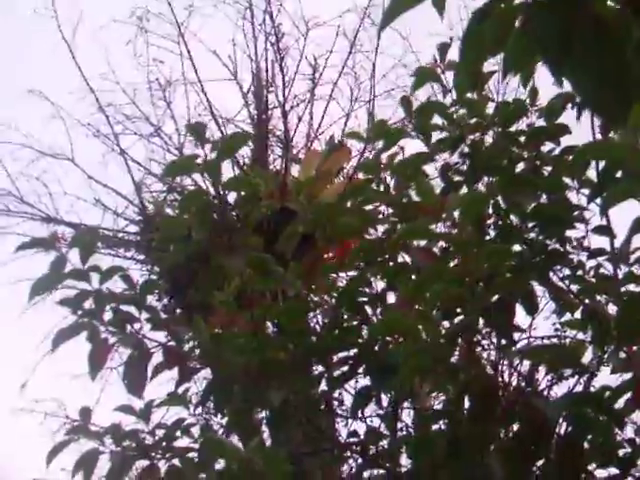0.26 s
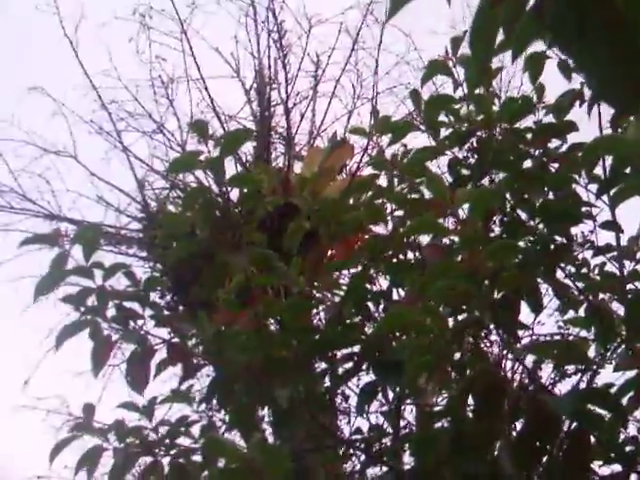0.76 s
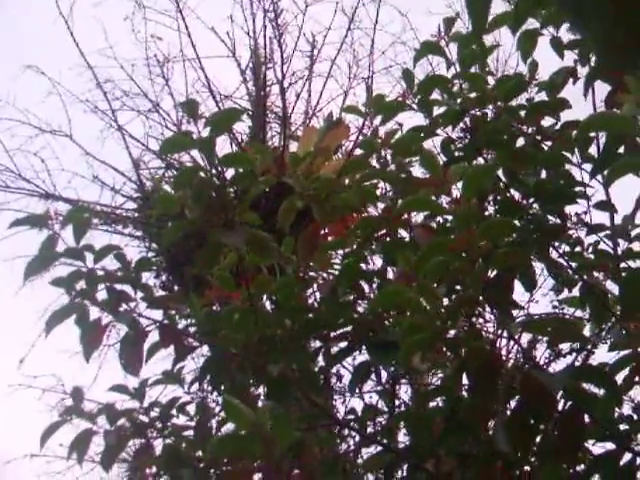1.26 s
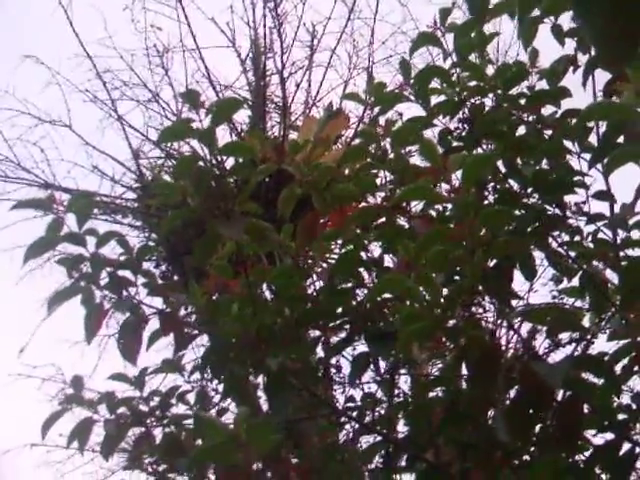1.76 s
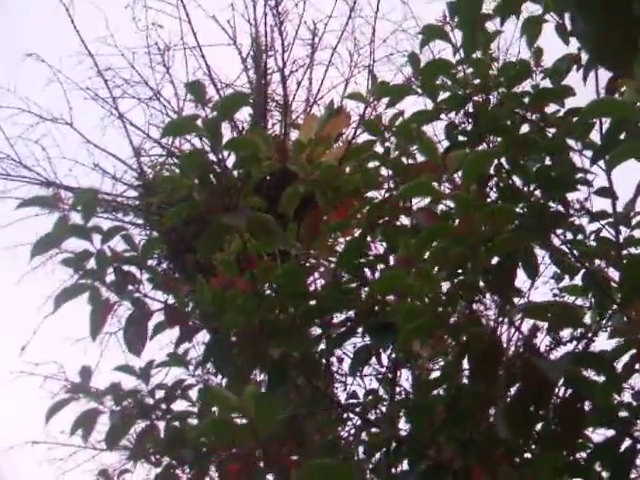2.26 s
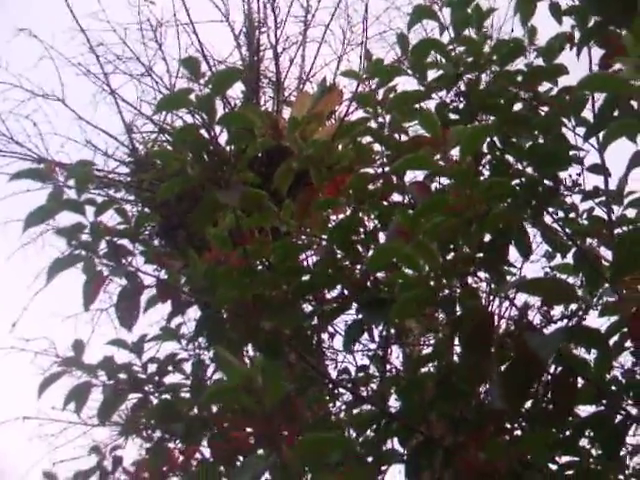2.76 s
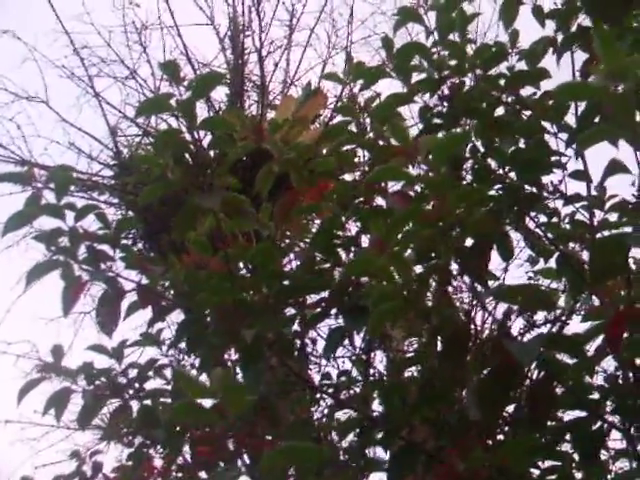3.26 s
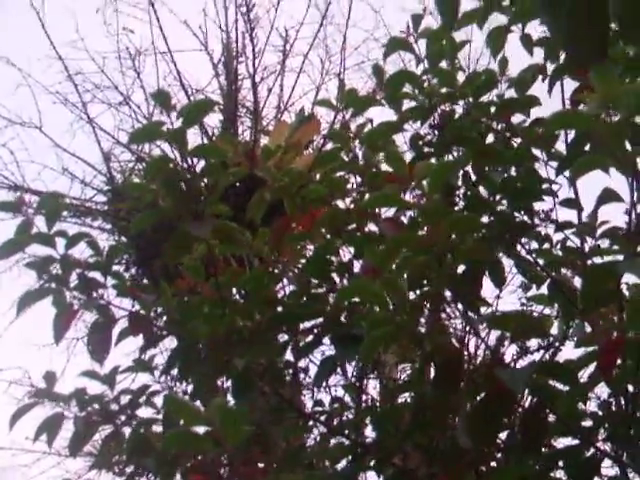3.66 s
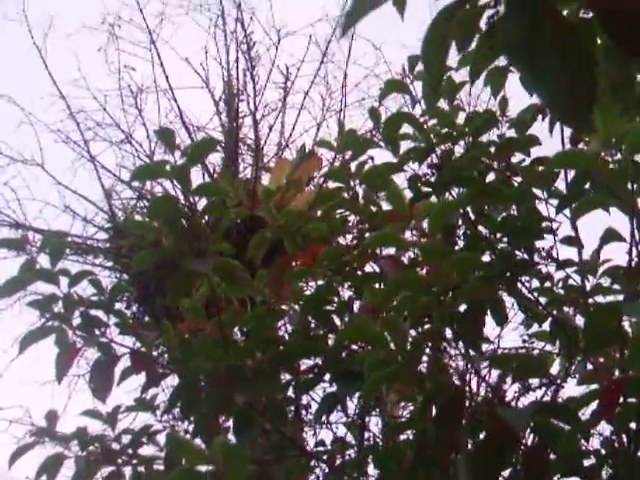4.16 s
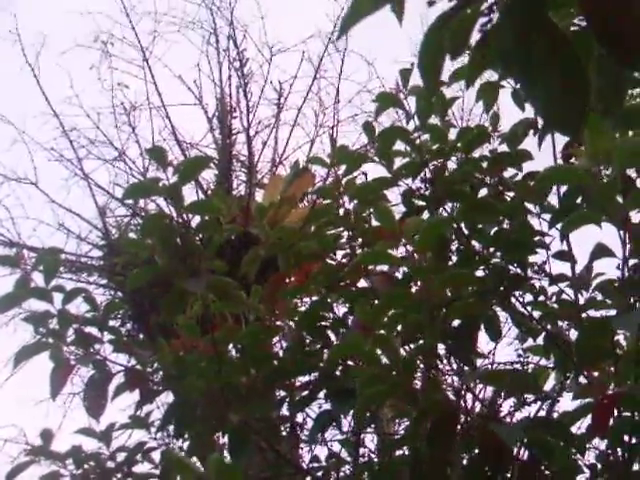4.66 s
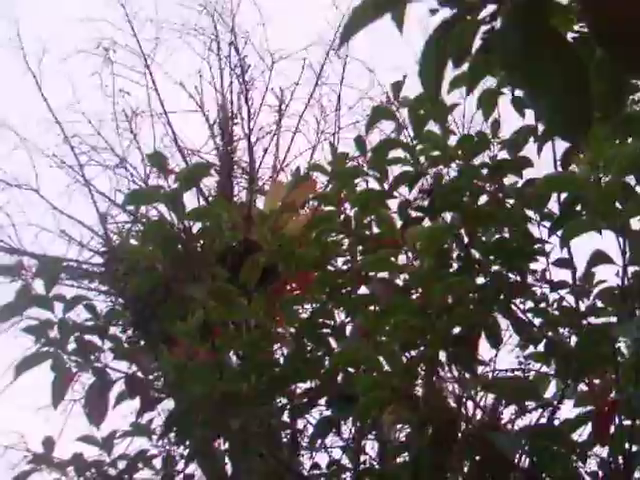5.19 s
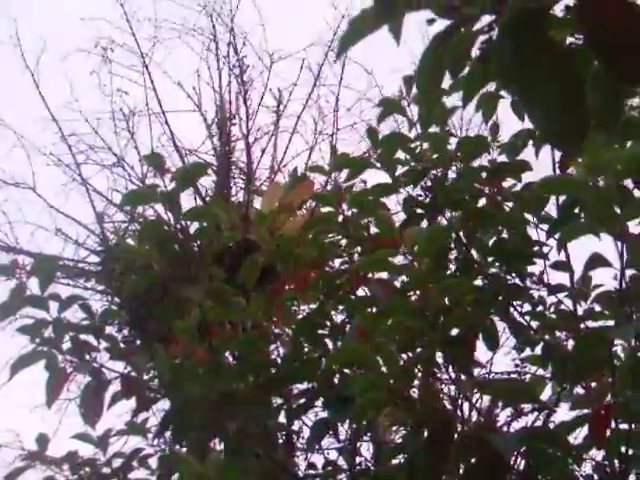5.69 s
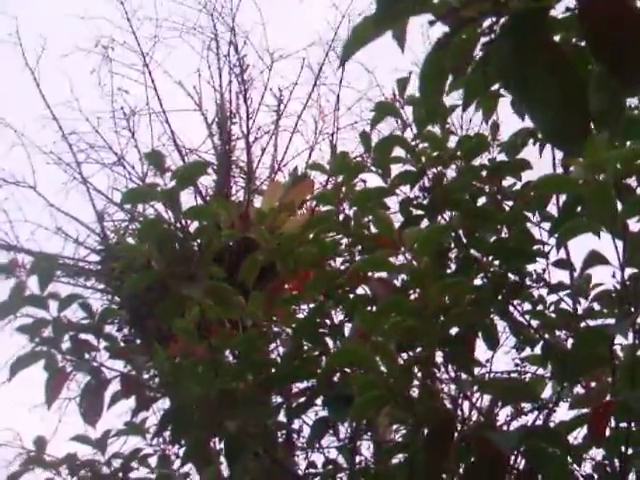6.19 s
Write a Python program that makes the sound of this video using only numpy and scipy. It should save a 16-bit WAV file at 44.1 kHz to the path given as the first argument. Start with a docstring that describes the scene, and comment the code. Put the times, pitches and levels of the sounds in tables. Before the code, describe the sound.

Several birds call over one another outdoors, sharp high chips nearby, slurred whistles behind, distant chirps echoing among trees over faint hiss.

```python
"""A small bird close by gives thin, high calls that mostly fall, in a dawn chorus among trees. A songbird further
off whistles and slurs its phrases, a third bird twitters faintly, and there are a few rasps and bill clicks.
Each voice is a near sine on a gliding pitch, buzzed by a flutter; rasps and clicks are noise through resonances.
Leaves and trunks add an echo tail to every call. Behind lie many distant birds, a hush of air and microphone
hiss, a narrow band of noise as a far-off hum, and a camera's thin whine."""
import sys
import numpy as np
from scipy import signal
from scipy.fft import rfft, irfft
from scipy.io import wavfile
from scipy.ndimage import uniform_filter1d

SR = 44100
rng = np.random.default_rng(int(sys.argv[2]) if len(sys.argv) > 2 else 0)


def generate_wav(sig):
    """Save sig (samples, or channels by samples) to the path in sys.argv[1] as 16-bit PCM at SR."""
    pcm = np.round(np.clip(np.atleast_2d(sig).T, -1, 1) * 32767).astype(np.int16)
    wavfile.write(sys.argv[1], SR, pcm)


N = 283563  # length of the scene in samples


def undb(db):
    """Turn decibels into a plain gain."""
    return 10 ** (np.asarray(db) / 20)


def add(out, start, sound):
    """Mix a sound in at its start time in seconds, cutting off what runs past the end."""
    i = max(int(start * SR), 0)
    out[i:i + len(sound)] += sound[:max(N - i, 0)]


def seconds(length):
    """The time axis of one note."""
    return np.arange(int(length * SR)) / SR


def band(x, hz, width_hz):
    """One resonance: it lets through a narrow range of pitches around hz."""
    b, a = signal.iirpeak(hz, hz / width_hz, SR)
    return signal.lfilter(b, a, x)


def level(x, db):
    """Scale a sound so that the rms of its loudest fiftieth of a second is db."""
    loudest_power = uniform_filter1d(x ** 2, size=SR // 50).max()
    return x * undb(db) / np.sqrt(loudest_power)


def wander(n, rate):
    """A smooth random curve of spread near 1 that changes about rate times a second."""
    steps = np.arange(n) * rate / SR
    return np.interp(steps, np.arange(4096), rng.standard_normal(4096))


def foliage(x, wet_db, t60, late_db, late_t60, build_s):
    """The direct sound, a dense scatter from nearby leaves and a weaker, longer one from trees beyond.

    wet_db is the energy of all echoes against the direct sound; each t60 is the seconds taken to fade by 60 dB.
    """
    t = np.arange(SR) / SR
    near_fade = undb(-60 * t / t60)
    late_fade = undb(late_db - 60 * t / late_t60)
    build_up = 1 - np.exp(-t / build_s)
    echoes = rng.standard_normal(SR) * (near_fade + late_fade) * build_up
    echoes *= undb(wet_db) / np.sqrt(np.sum(echoes ** 2))
    echoes[0] += 1  # the direct sound
    return signal.fftconvolve(x, echoes)


def syrinx(hz, buzz_hz, buzz_rate, crest, edge):
    """A bird's voice: a near sine follows a pitch path while an uneven flutter of the membrane buzzes it.

    Air pressure peaks at crest (0 = start, 1 = end); a smaller edge makes the start and end more abrupt.
    """
    n = len(hz)
    cycle = np.cumsum(buzz_rate * (1 + 0.2185 * wander(n, 118.6))) / SR
    flutter = np.sin(2 * np.pi * cycle) * (1 + 0.38 * wander(n, 140))
    unsteady_hz = hz * (1 + 0.0031 * wander(n, 141.4))
    pitch = unsteady_hz + buzz_hz * flutter
    swell = np.interp(np.linspace(0, 1, n), [0, np.clip(crest, .1, .9), 1], [0, .5, 1])
    pressure = np.abs(np.sin(np.pi * swell)) ** edge
    return pressure * np.sin(2 * np.pi * np.cumsum(pitch) / SR)


# Overall colour of the hush. Each row: pitch in Hz, relative level in dB per Hz.
HUSH_COLOUR = [(21, -36.5), (35, -5.5), (49, -4), (246, -9), (450, -7.5), (1610, -13.5), (2210, -12.5),
               (4830, -19.5), (7400, -20.5), (9620, -37), (16300, -120)]
# Slow change in the lower middle of the hush. Each row: time in seconds, level change in dB.
HUSH_SWELL = [(0, -.4), (1.2, 1.1), (2.3, 1.7), (3.2, -0.5), (6.4, -1)]
SWELL_HZ, SWELL_WIDTH_HZ = 560, 600
HUSH_DB = -44


def hush():
    """Shaped noise for distant air, running into flat microphone hiss at the top; its level drifts very slightly."""
    hz, db = np.transpose(HUSH_COLOUR)
    bins = np.clip(np.arange(N // 2 + 1) * SR / N, 1, 7000)  # the hiss is flat above 7000 Hz
    colour = undb(np.interp(np.log(bins), np.log(hz), db))
    air = irfft(rfft(rng.standard_normal(N)) * colour, N)
    swell_db = np.interp(np.arange(N) / SR, *np.transpose(HUSH_SWELL))
    air = air + (undb(swell_db) - 1) * band(air, SWELL_HZ, SWELL_WIDTH_HZ)
    return air / air.std() * undb(HUSH_DB + 0.22 * wander(N, 0.98))


WHINE_HZ, WHINE_DB = 7870, -56


def whine():
    """A thin sine tone from the camera's electronics, with a slightly unsteady pitch."""
    pitch = WHINE_HZ + 25 * wander(N, 200)
    return level(np.sin(2 * np.pi * np.cumsum(pitch) / SR), WHINE_DB)


def far_chorus(count=46):
    """Many distant birds: soft gliding notes, each with a long echo tail nearly as strong as the note."""
    out = np.zeros(N)
    for k, (when, size, pitch, glide, loud) in enumerate(rng.random((count, 5))):
        hz = 2100 * 1.9 ** pitch
        length = 0.044 + 0.083 * size
        path = hz * (1 + 0.2507 * (glide - .6) * np.linspace(-1, 1, int(length * SR)))
        note = syrinx(path, 48, buzz_rate=55, crest=0.94, edge=0.94)
        echoed = foliage(note, wet_db=-1.5, t60=.7, late_db=-6.0, late_t60=1.1, build_s=0.022)
        start = (k + when) * N / SR / count  # one note at a random moment in each equal slot
        add(out, start, level(echoed, -55 + 6 * loud - 5 * pitch))  # higher notes are fainter
    return out


def arc(length, pitches):
    """A smooth glide through a start, middle and end pitch."""
    curve = np.polyfit([0, .5, 1], pitches, 2)
    return np.polyval(curve, np.linspace(0, 1, int(length * SR)))


def phrases(times, lead, notes):
    """Sing one phrase at each of its times: the lead whistle varies in length, the rest is timed from its end."""
    *lead_pitches, lead_buzz_hz = lead
    for start, lead_s, db in times:
        yield start, lead_s, *lead_pitches, db, lead_buzz_hz
        for delay, length, *pitches, step_db, buzz_hz in notes:
            yield start + lead_s + delay, length, *pitches, db + step_db, buzz_hz


# The songbird has three phrases: stair, slur and burr.
# When each phrase is sung. Each row: start of the lead whistle in seconds, its length in seconds, level in dB.
STAIRS = [(.163, 0.05, -37.5), (4.54, 0.096, -35), (5.124, .08, -33)]
SLURS = [(1.222, .074, -42), (3.365, .085, -41)]
BURRS = [(.713, .103, -33.5), (2.833, .113, -33)]
# The lead whistle of each phrase. One row: first, middle and last pitch in Hz, buzz depth in Hz.
STAIR_LEAD = (2550, 2430, 2375, 11)
SLUR_LEAD = (2015, 1808, 1584, 48)
BURR_LEAD = (3086, 2935, 2905, 32)
# The other notes of each phrase. Each row: delay from the lead's end in seconds, length in seconds,
# first, middle and last pitch in Hz, level against the lead in dB, buzz depth in Hz.
STAIR_NOTES = [(-.005, .046, 2280, 2000, 2200, -7, 28), (.06, .046, 2245, 2107, 1994, -6, 35),
               (.103, .055, 1935, 1848, 1845, -8, 13)]
SLUR_NOTES = [(.01, 0.197, 2404, 2108, 2018, 6.7, 25)]
BURR_NOTES = [(-.215, .065, 2880, 2927, 2940, -14.5, 10), (0, 0.1256, 2480, 2562, 2601, -3, 310)]
# Its notes outside the phrases. Each row: start in seconds, length in seconds,
# first, middle and last pitch in Hz, level in dB, buzz depth in Hz.
LONE_NOTES = [ (.134, 0.066, 2870, 2915, 2920, -46, 10), (1.84, .11, 2132, 2446, 2687, -36.5, 170),
              (2.256, 0.049, 1797, 1940, 2090, -45.5, 15), (2.325, 0.27, 2040, 2015, 1922, -37, 8),
              (3.926, 0.096, 2513, 2548, 2375, -42.5, 79), (5.558, 0.092, 2985, 2950, 2930, -52.5, 10),
              (5.695, 0.077, 3133, 2950, 3115, -36, 84), (5.716, 0.073, 2690, 2594, 2454, -40, 190)]


def songbird():
    """Mellow whistles and buzzy slurs glide along smooth arcs from further off, with a longer tail."""
    out = np.zeros(N)
    song = [*phrases(STAIRS, STAIR_LEAD, STAIR_NOTES),
            *phrases(SLURS, SLUR_LEAD, SLUR_NOTES),
            *phrases(BURRS, BURR_LEAD, BURR_NOTES),
            *LONE_NOTES]
    for start, length, *pitches, db, buzz_hz in song:
        note = syrinx(arc(length, pitches), buzz_hz, buzz_rate=75, crest=0.58, edge=0.32)
        echoed = foliage(note, wet_db=5.5, t60=0.43, late_db=-17, late_t60=1.1, build_s=0.013)
        add(out, start, level(echoed, db))
    return out


def opening(t, buzz_hz):
    """Buzz depth that grows through a note, from 0.44 of its full value."""
    return buzz_hz * np.linspace(0.44, 1, len(t))


# Slides that fall and level out. Each row: start in seconds, length in seconds, top pitch in Hz,
# end pitch in Hz, level in dB, buzz depth at the end in Hz.
SLIDES = [(1.846, 0.096, 7880, 6635, -30, 50), (2.419, .09, 8710, 6880, -21.5, 230),
          (5.389, .104, 8120, 6690, -27.5, 25), (5.991, 0.094, 8650, 6877, -18.5, 260)]
SLIDE_CURVE = 1.65  # above 1, the fall starts fast and levels out
# Chips that flick down onto a pitch and sag. Each row: start in seconds, length in seconds, pitch in Hz,
# height of the flick above it in Hz, level in dB, buzz depth at the end in Hz.
CHIPS = [ (0.344, 0.047, 6630, 1000, -33.5, 110), (0.874, .1, 7470, 200, -44, 190),
         (1.778, .047, 7070, 300, -35, 523), (2.511, 0.033, 7250, 200, -28, 278),
         (2.66, 0.037, 6480, 1000, -35.5, 70), (2.686, 0.033, 7000, 300, -25.5, 400),
         (3.092, 0.014, 6806, 1450, -25, 40), (3.327, .074, 7260, 100, -44, 160),
         (3.493, 0.061, 7144, 1400, -21.5, 450), (3.995, .08, 7166, 1300, -24.5, 420),
         (6.261, 0.016, 6660, 400, -23.5, 191)]
FLICK_S, SAG_HZ_PER_S = .004, 7500
# Short upward scoops from one low pitch. Each row: start in seconds, length in seconds, level in dB.
SCOOPS = [(0.538, 0.047, -37), (1.699, 0.029, -47), (2.882, .036, -42), (6.251, 0.015, -31.5)]
SCOOP_HZ, SCOOP_HZ_PER_S, SCOOP_BUZZ_HZ = 6390, 22000, 45
# Wide buzzes on one high pitch. Each row: start in seconds, length in seconds, level in dB.
BUZZES = [(0.575, 0.1, -31), (1.043, 0.068, -39.5), (2.096, .077, -43.5), (2.916, 0.076, -34)]
BUZZ_HZ, BUZZ_DEPTH_HZ = 7940, 460


def thin_calls():
    """The near bird's slides, chips, scoops and buzzes as (start, pitch path, level, buzz depth)."""
    for start, length, top_hz, end_hz, db, buzz_hz in SLIDES:
        t = seconds(length)
        path = end_hz + (top_hz - end_hz) * (1 - t / length) ** SLIDE_CURVE
        yield start, path, db, opening(t, buzz_hz)
    for start, length, hz, flick_hz, db, buzz_hz in CHIPS:
        t = seconds(length)
        path = hz + flick_hz * np.exp(-t / FLICK_S) - SAG_HZ_PER_S * t
        yield start, path, db, opening(t, buzz_hz)
    for start, length, db in SCOOPS:
        yield start, SCOOP_HZ + SCOOP_HZ_PER_S * seconds(length), db, SCOOP_BUZZ_HZ
    for start, length, db in BUZZES:
        yield start, np.full_like(seconds(length), BUZZ_HZ), db, BUZZ_DEPTH_HZ


def near_bird():
    """Thin high calls with a fast flutter, most of them falling, in the nearest crown."""
    out = np.zeros(N)
    for start, path, db, buzz_hz in thin_calls():
        length = len(path) / SR
        edge = 0.099 + (length / 0.32) ** 2  # short calls burst out, long ones swell
        note = syrinx(path, buzz_hz, buzz_rate=180, crest=0.73, edge=edge)
        echoed = foliage(note, wet_db=3.5, t60=0.29, late_db=-19.5, late_t60=0.84, build_s=0.0065)
        add(out, start, level(echoed, db))
    return out


# Harsh rasps. Each row: start in seconds, length in seconds, level in dB.
RASPS = [(0.515, 0.037, -37.5), (6.339, 0.026, -37)]
# Resonances of the rasping throat. Each row: pitch in Hz, width in Hz, gain in dB.
RASP_THROAT = [(3120, 460, 0.5), (3670, 950, -3.5), (4740, 1000, -16.5), (5210, 360, 0.5)]
# Bill clicks. Each row: start in seconds, level in dB.
CLICKS = [(.797, -48.5), (.815, -53), (.836, -44.5), (.866, -47.5), (.924, -47)]


def scolding():
    """Rasps are uneven trains of noise pulses through the throat; a bill click is a single short snap of noise."""
    out = np.zeros(N)
    for start, length, db in RASPS:
        n = int(length * SR)
        cycle = np.cumsum(260 * (1 + 0.2 * wander(n, 300))) / SR  # about 260 pulses a second
        pulses = np.exp(-(cycle % 1)) * rng.standard_normal(n)
        rasp = sum(undb(gain_db) * band(pulses, hz, width) for hz, width, gain_db in RASP_THROAT)
        echoed = foliage(rasp, wet_db=9.5, t60=0.17, late_db=-24.5, late_t60=.7, build_s=0.0042)
        add(out, start, level(echoed, db))
    for start, db in CLICKS:
        t = np.arange(SR // 50) / SR
        burst = rng.standard_normal(len(t)) * np.exp(-t / 0.0035)
        snap = band(band(burst, 4800, 1500), 6000, 1500)
        echoed = foliage(snap, wet_db=-1.5, t60=0.21, late_db=-23, late_t60=.6, build_s=.006)
        add(out, start, level(echoed, db))
    return out


def sweeps(rows, octaves_per_s, bend, buzz_hz):
    """Notes of one kind glide at the same mean speed from their own first pitch."""
    notes = []
    for start, length, hz, db in rows:
        progress = (seconds(length) / length) ** bend
        notes.append((start, hz * 2 ** (octaves_per_s * length * progress), db, buzz_hz))
    return notes


def warble(count):
    """Soft short notes of random pitch and glide, one at a random moment in each equal slot of the warble."""
    notes = []
    for k, (when, size, pitch, slope, bend) in enumerate(rng.random((count, 5))):
        hz = 2900 * 1.7 ** pitch
        shape = np.array([.5 - slope, .5 * (bend - .5), slope - .5])
        path = arc(0.0079 + 0.022 * size, hz * (1 + 0.24 * shape))
        start = WARBLE_SPAN[0] + (k + when) / count * np.ptp(WARBLE_SPAN)
        notes.append((start, path, WARBLE_DB, 40))
    return notes


# Clear falling and rising sweeps. Each row: start in seconds, length in seconds, first pitch in Hz, level in dB.
FALLS = [(2.81, .05, 5140, -52.5), (3.196, 0.043, 5200, -49), (3.258, .034, 4200, -49),
         (3.552, .034, 4380, -51), (4.296, 0.022, 4200, -47), (4.512, 0.037, 4380, -47),
         (5.002, 0.044, 4970, -55), (5.47, .03, 4900, -55), (5.695, 0.053, 5150, -49.5),
         (5.75, .035, 4250, -50)]
RISES = [(3.445, 0.073, 2720, -46.5), (3.765, 0.025, 2900, -46), (4.018, 0.025, 4600, -45),
         (4.098, 0.024, 4400, -44), (4.278, 0.03, 3350, -50), (4.668, .022, 3750, -49.5)]
# How they sweep. One row: mean speed in octaves per second,
# bend (1 is even, more speeds up, less slows down), buzz depth in Hz.
FALL_SWEEP = (-6.5, .8, 5)
RISE_SWEEP = (12, 1.5, 15)
# Sinking trills. Each row: start in seconds, length in seconds, first pitch in Hz, level in dB, buzz depth in Hz.
TRILLS = [(1.363, 0.15, 5750, -53.5, 280), (2.371, 0.061, 4146, -42, 70), (2.739, 0.2, 4030, -47, 220),
          (4.552, .13, 5970, -58, 159.8), (4.7, 0.08, 3505, -49, 80), (4.933, .054, 4150, -50, 70),
          (5.141, .1, 3510, -48, 80)]
TRILL_OCT_PER_S = -1.6
# When the soft warble is heard. One row: from and to, in seconds.
WARBLE_SPAN = (3, 5.6)
WARBLE_DB = -56.5


def twitterer(count=34):
    """Faint quick sweeps up and down and sinking trills, with a stretch of softer, short warbled notes."""
    out = np.zeros(N)
    notes = sweeps(FALLS, *FALL_SWEEP) + sweeps(RISES, *RISE_SWEEP)
    for start, length, hz, db, buzz_hz in TRILLS:
        notes.append((start, hz * 2 ** (TRILL_OCT_PER_S * seconds(length)), db, buzz_hz))
    notes += warble(count)
    for start, path, db, buzz_hz in notes:
        note = syrinx(path, buzz_hz, buzz_rate=130, crest=0.37, edge=0.17)
        echoed = foliage(note, wet_db=-2, t60=.35, late_db=-18.5, late_t60=.8, build_s=0.0048)
        add(out, start, level(echoed, db))
    return out


# When the hum swells. One row: peak time in seconds, seconds from the peak until it has dropped by 8.7 dB.
HUM_SWELL = (4.0, .5)
HUM_HZ, HUM_WIDTH_HZ = 399, 30
HUM_DB = -56  # rms at the peak of the swell


def hum():
    """A faint far-off hum: noise through two narrow resonances that swells once and fades."""
    peak_s, half_s = HUM_SWELL
    tone = band(band(rng.standard_normal(N), HUM_HZ, HUM_WIDTH_HZ), HUM_HZ, HUM_WIDTH_HZ)
    swell = np.exp(-((np.arange(N) / SR - peak_s) / half_s) ** 2)
    return tone / tone.std() * undb(HUM_DB) * swell


def scene():
    """All the birds over the hush, the hum and the whine, as one channel."""
    background = hush() + whine() + far_chorus() + hum()
    birds = songbird() + near_bird() + scolding() + twitterer()
    return (background + birds)[None]


CONVERTER_HZ = 16000  # samples per second in the camera
TOP_HZ = 8950  # nearly everything above this is removed


def record(dry):
    """A small camera with a slow converter: its gentle filter mirrors the highest calls about half its rate."""
    sampled = signal.resample_poly(dry, CONVERTER_HZ, SR, axis=1)
    played = signal.resample_poly(sampled, SR, CONVERTER_HZ, axis=1)[:, :N]
    low_pass = signal.ellip(10, .2, 75, TOP_HZ, fs=SR, output="sos")
    return signal.sosfilt(low_pass, played)


dry = scene()
out = record(dry)
generate_wav(out)
```